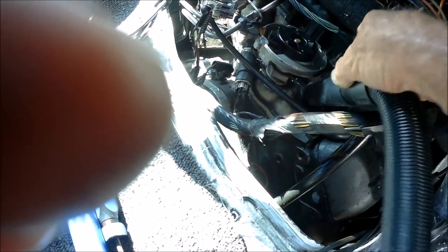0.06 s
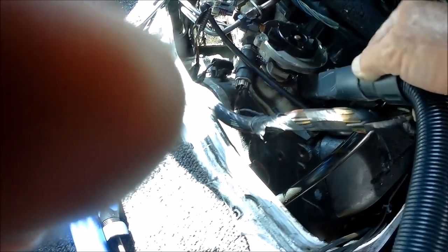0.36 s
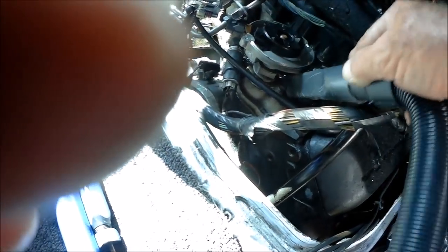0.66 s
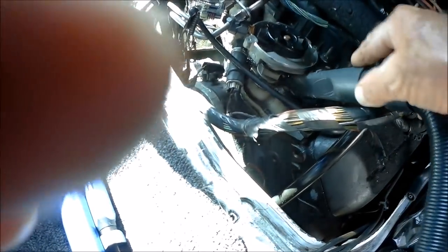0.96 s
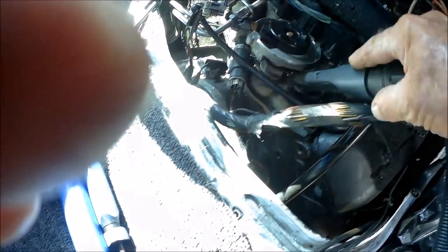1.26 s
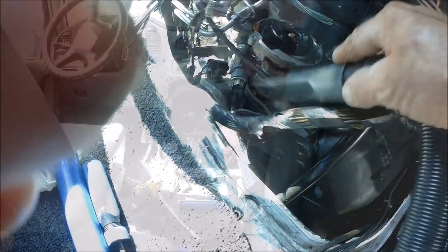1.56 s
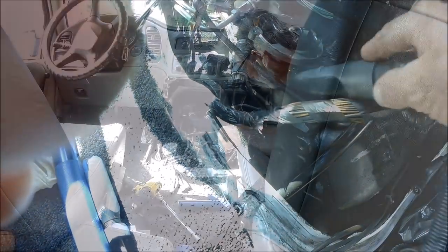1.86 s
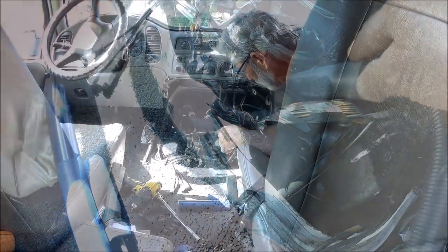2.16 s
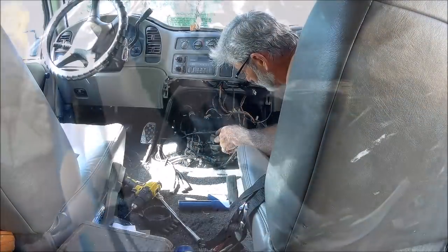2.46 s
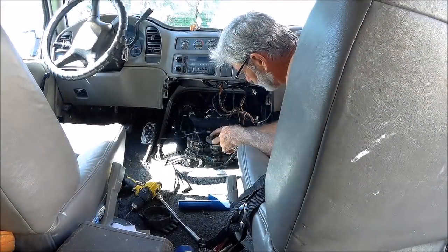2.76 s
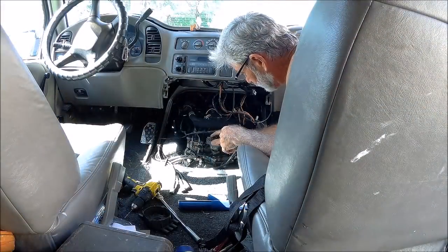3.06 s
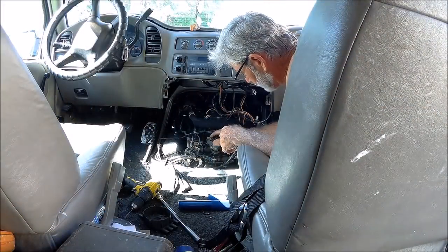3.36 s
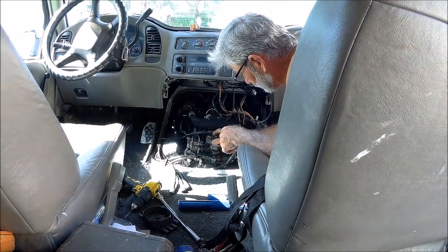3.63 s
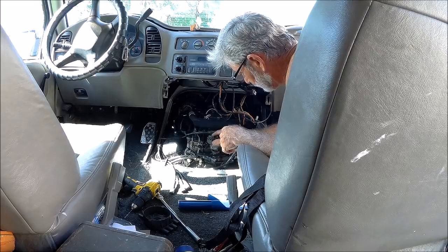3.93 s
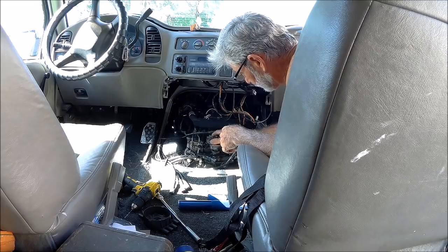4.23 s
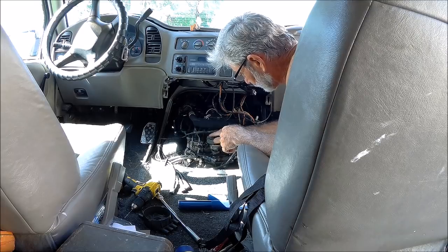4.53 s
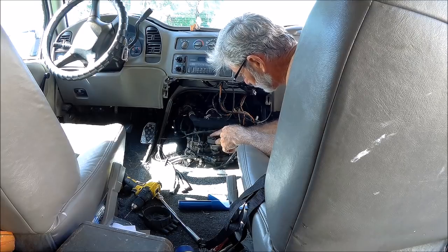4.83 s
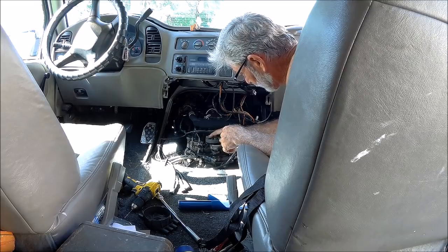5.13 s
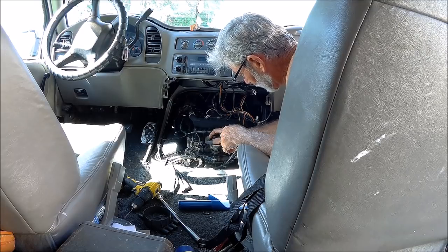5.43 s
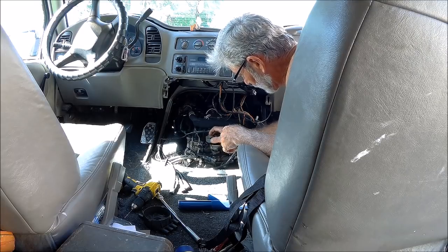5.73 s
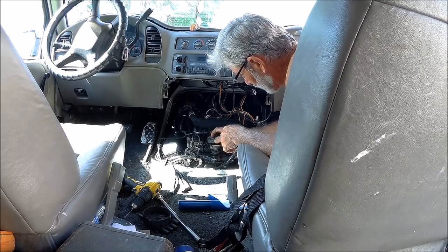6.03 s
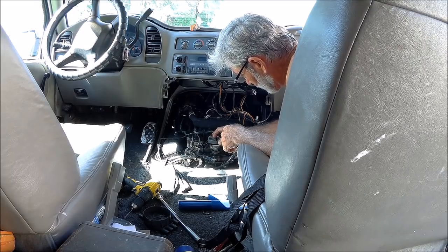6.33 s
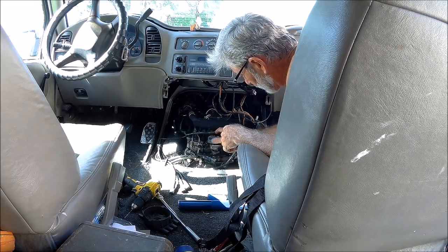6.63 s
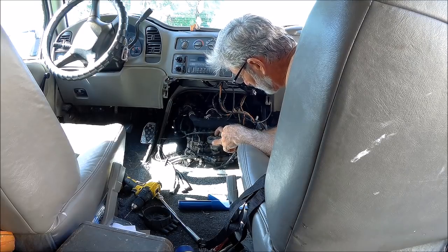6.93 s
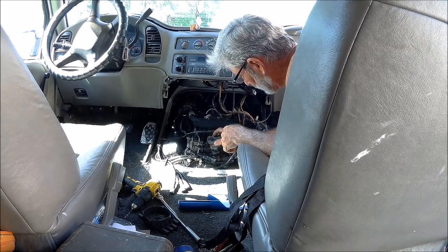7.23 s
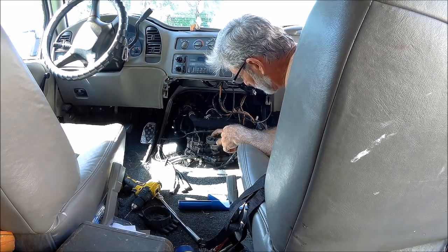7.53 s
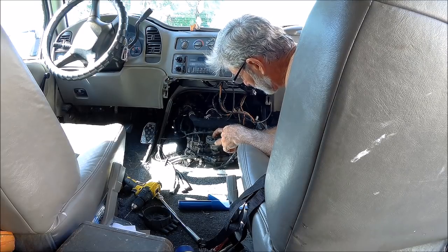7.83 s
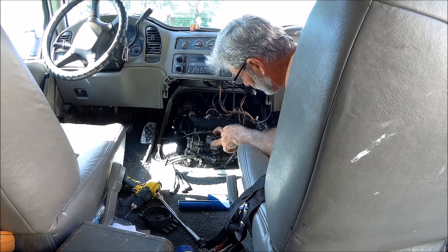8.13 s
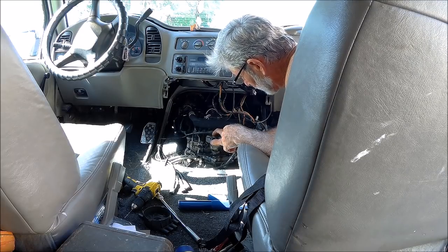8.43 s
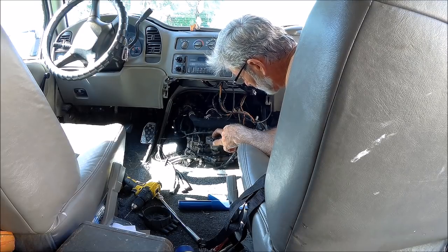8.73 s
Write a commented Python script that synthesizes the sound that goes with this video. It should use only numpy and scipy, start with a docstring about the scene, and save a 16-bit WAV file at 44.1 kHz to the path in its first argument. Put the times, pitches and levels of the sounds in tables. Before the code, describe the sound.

From the start, a small vacuum cleaner runs close by inside a van, the loudest sound: turbulent rushing air and fluttering nozzle hiss, with a steady high whine over a lower motor hum. The hose gives a hollow swell around 1.3 seconds, and a faint deep rumble sets in there, ebbing by 3.5. At 2.8 seconds the vacuum cuts off dead. A sharp clack follows at 2.9, then a brief rub. A hand works at engine fittings, making short, irregular clicks with a slight metallic ring in the cramped cab. A few come between 3.7 and 4 seconds, lighter ones follow, and a quick, louder cluster falls between 5 and 5.4. Softer clicks and small scrapes continue until about 8.6 seconds. Underneath throughout lies a quiet wash of outdoor air, joined after the first second by the low, wavering drone of distant engines.

```python
"""Inside a van, a small vacuum cleaner sucks at the engine bay: turbulent air rushes through nozzle and
hose, exciting their resonances, under the whine of a nine-blade fan. Its sound is cut off dead. Then a
hand rubs and works at the engine's fittings, whose impacts click, clack and ring in the cramped cab.
Distant engines drone over a wash of outdoor air, and a deep rumble sets in and ebbs."""
import sys
import numpy as np
from scipy import signal
from scipy.fft import rfft, irfft, next_fast_len
from scipy.io import wavfile
from scipy.ndimage import uniform_filter1d

SR = 44100
rng = np.random.default_rng(int(sys.argv[2]) if len(sys.argv) > 2 else 0)


def unload_audio(sound):
    """Save the sound as a 16-bit wav file, at the path given as the first command line argument."""
    columns = np.transpose(np.atleast_2d(sound))
    # keep every value between -1 and 1, then stretch to whole-number steps
    steps = np.round(np.clip(columns, -1, 1) * 32767)
    wavfile.write(sys.argv[1], SR, steps.astype(np.int16))


N = 387198
T = np.arange(N) / SR


def undb(db):
    """Decibels to amplitude ratio."""
    return 10 ** (np.asarray(db) / 20)


def unit(x):
    """Normalise to rms 1."""
    return x / np.sqrt(np.mean(x ** 2))


def curves(table):
    """Linear interpolation of (time_s, value, ...) rows: one curve per value column."""
    times, *columns = np.transpose(table)
    return [np.interp(T, times, column) for column in columns]


def swell(centre_s, half_s):
    """Gaussian envelope, down to 1/e at half_s either side of its centre."""
    return np.exp(-((T - centre_s) / half_s) ** 2)


def colour(x, points):
    """Spectral shaping by (frequency_hz, gain_db) points, joined on a log frequency axis."""
    hz, db = np.transpose(points)
    bins_hz = np.maximum(np.fft.rfftfreq(len(x), 1 / SR), 1)
    gain_db = np.interp(np.log(bins_hz), np.log(hz), db)
    return irfft(rfft(x) * undb(gain_db), len(x))


def band(x, lo_hz, hi_hz, order=2):
    """Causal Butterworth band-pass."""
    return signal.sosfilt(signal.butter(order, [lo_hz, hi_hz], "band", fs=SR, output="sos"), x)


def noise(points):
    """Gaussian noise with a given spectral shape, rms 1."""
    return unit(colour(rng.standard_normal(next_fast_len(N)), points)[:N])


def walk(rate_hz):
    """Slow random modulation: values held for 1 / rate_hz and smoothed twice, rms 1."""
    hold = int(SR / rate_hz)
    held = np.repeat(rng.standard_normal(N // 20)[:N // hold + 1], hold)
    return unit(uniform_filter1d(uniform_filter1d(held, hold), hold)[:N])


def tone(hz):
    """A sine of rms 1 whose phase is the integral of a frequency curve."""
    return np.sqrt(2) * np.sin(2 * np.pi * (np.cumsum(hz) / SR + rng.random()))


def resonance(hz, width_hz):
    """A randomly driven resonator gives narrow-band noise about a steady or moving centre; rms 1."""
    if np.ndim(hz) == 0:
        return unit(band(rng.standard_normal(N), hz - width_hz / 2, hz + width_hz / 2))
    lowpass = signal.butter(2, width_hz / 2, fs=SR, output="sos")
    in_phase, quadrature = signal.sosfilt(lowpass, rng.standard_normal((2, N)))
    phase = 2 * np.pi * np.cumsum(hz) / SR
    return unit(in_phase * np.cos(phase) + quadrature * np.sin(phase))


def ring(t, hz, db, t60_s):
    """Free vibration of a damped mode: a sine that falls 60 dB in t60_s."""
    return undb(db - 60 * t / t60_s) * np.sin(2 * np.pi * (hz * t + rng.random()))


def outdoor_air(level_db=-45.5):
    """Ambient noise: a soft broadband wash, strongest at low frequencies."""
    # frequency_hz, relative_density_db
    spectrum = [(20, -8.5), (55, -3.5), (110, -5), (160, -4.5), (250, -11), (400, -13), (750, -12.5),
                (1100, -12), (1450, -16.5), (1750, -16.5), (2400, -21.5), (3500, -28.5), (9000, -32.5),
                (14000, -33.5)]
    return undb(level_db + .3 * walk(12)) * noise(spectrum)


def drone(hz, db):
    """Periodic firing gives a distant engine its note, wavering in level and pitch."""
    return undb(db + 1.8 * walk(9.5)) * tone(hz + 0.8 * walk(14))


def traffic(high_hz=86.2, low_hz=64, eases_s=3.57, enters_s=3.3, pulls_s=7.9, climb_hz_per_s=8):
    """Firing frequency follows engine speed: one engine eases off; another enters, then pulls away."""
    # the first engine: time_s, level_db
    near_level = [(1.2, -80), (1.35, -43.5), (1.8, -58), (2.2, -46), (3.4, -49), (3.6, -49), (3.8, -48),
                  (4.3, -50), (4.5, -52), (4.7, -43), (5.65, -47.5), (6.0, -58.5), (6.4, -49), (6.9, -50),
                  (7.6, -55.5), (8.7, -54)]
    eased = (1 + np.tanh((T - eases_s) / .18)) / 2
    near = drone(high_hz + (low_hz - high_hz) * eased, curves(near_level)[0])
    arrival = np.clip((T - enters_s) / .15, 0, 1)
    far_hz = 103 + climb_hz_per_s * np.maximum(T - pulls_s, 0)
    far_db = -60.5 + (T - enters_s)  # grows 1 dB a second
    return near + arrival * drone(far_hz, far_db)


def rumble():
    """Narrow-band noise low in the bass is heard as a deep rumble; it sets in and ebbs."""
    # time_s, level_db
    level = [(1.22, -74), (1.3, -49), (2.2, -51), (2.9, -55), (3.6, -67)]
    return undb(curves(level)[0]) * resonance(42.7, width_hz=24)


def rubbing():
    """Sliding friction: the hand scrapes along the parts in short strokes of grainy noise."""
    # strokes of the hand: centre_s, half_length_s, level_db
    strokes = [(3.28, 0.019, -49), (6.916, .02, -51), (7.07, .012, -53), (7.197, .02, -51),
               (7.26, .025, -46.5), (7.735, .012, -51), (7.905, .012, -49), (7.96, .01, -50)]
    # friction noise: frequency_hz, relative_density_db
    spectrum = [(400, -25), (800, -4), (1200, -7), (1650, 4), (2100, 1), (2550, -10), (3000, -6),
                (3600, -16), (4500, -28), (9000, -40)]
    envelope = sum(undb(db) * swell(s, half_s) for s, half_s, db in strokes)
    grain_db = 3 * walk(250)
    return envelope * unit(undb(grain_db) * noise(spectrum))


def chatter(t, chatter_s, tail_db=-20, tail_t60_s=.34):
    """Contact noise: a burst of random force with the cab's short reverberant tail; rms 1."""
    # colour of a contact: frequency_hz, gain_db
    spectrum = [(250, 0), (500, -5), (820, 1), (1000, -3), (1180, -4), (1430, 9), (1650, 15), (2000, 13.5),
                (2350, 18.5), (2700, -5.5), (3250, -5), (4200, -15), (7000, -17), (9000, -25)]
    burst = np.exp(-(t / (1.25 * chatter_s)) ** 2.5) * (1 + .6 * np.exp(-t / .002))
    tail = undb(tail_db - 60 * t / tail_t60_s)
    force = rng.standard_normal(len(t)) * (burst + tail)
    return unit(colour(np.pad(force, (0, len(t))), spectrum)[:len(t)])


def fitting_modes(t):
    """Modal superposition: each contact lands elsewhere and so favours other modes; rms 1."""
    # modes of the fittings: pitch_hz, relative_db, t60_s
    modes = [(803, 5.5, 0.077), (1652, 19, 0.1), (1767, 9, 0.086), (1925, 20.5, 0.068), (2170, 10, 0.12),
             (2350, 7, 0.14), (2400, -6, 0.14), (2780, -1, 0.18), (3550, -1, 0.078)]
    favour_db = 3 * rng.standard_normal(len(modes))
    return unit(sum(ring(t, hz, db + extra, t60) for (hz, db, t60), extra in zip(modes, favour_db)))


def metal_rings(t, twang_db, tick_db, ping_gain):
    """Impact excites high modes: a springy twang, thin tings and a ping, each dying away freely."""
    # springy part: pitch_hz, relative_db, t60_s
    twang_modes = [(2960, 3, 0.053), (3300, -4, 0.035), (3374, -1.5, 0.083)]
    # thin metal: pitch_hz, relative_db, t60_s
    ting_modes = [(4660, -5, .045), (5350, -1, .06), (6100, -4, .045), (6750, 1, .055), (7170, -2, .045)]
    detune = 1 + .015 * rng.standard_normal()
    twang = sum(ring(t, hz * detune, db, t60) for hz, db, t60 in twang_modes)
    tings = sum(ring(t, hz * detune, db + 4 * rng.standard_normal(), t60) for hz, db, t60 in ting_modes)
    ping = ping_gain * ring(t, hz=5330, db=12, t60_s=.1)
    return undb(twang_db) * twang + undb(tick_db) * (tings + ping)


def click(strength_db, weight_db, hardness_db, pitch_hz, chatter_s, firm_db=-24, hard_db=-39):
    """One impact: around a pitched clack, weight fills in the low bands and hardness the high ones."""
    # bounds of the thud, knock, rattle, snap and tick bands: edge_hz
    edges = [430, 1000, 1450, 2650, 4100, 8400]
    t = np.arange(SR // 4) / SR
    rise_s = .0004 * undb(.35 * (firm_db - strength_db))  # light touches start more softly
    onset = 1 - np.exp(-t / rise_s)
    contact = onset * (chatter(t, chatter_s) + undb(-5) * fitting_modes(t))
    clack = unit(band(contact, .86 * pitch_hz, 1.14 * pitch_hz, order=3))
    bands = np.array([unit(band(contact, lo, hi, order=5)) for lo, hi in zip(edges, edges[1:])])
    bands[-1] = unit(bands[-1] * (1 + 1.1 * np.exp(-t / .004)))  # the tick bites at first touch
    thud_db, knock_db = weight_db - 15.5, weight_db - 19.5
    rattle_db = (weight_db + hardness_db) / 2 - 10.5
    snap_db, tick_db = hardness_db - 12.5, .99 * hardness_db - 21
    body = clack + undb([thud_db, knock_db, rattle_db, snap_db, tick_db]) @ bands
    body *= np.sqrt(.025 / t[-1])  # gives the clack the energy of 25 ms at rms 1
    twang_db = snap_db + .97 * hardness_db
    ping_gain = min(undb(strength_db + tick_db - hard_db), 1) ** 2  # only a hard blow wakes it fully
    metal = metal_rings(t, twang_db, tick_db, ping_gain)
    return undb(strength_db) * (body + onset * metal)


def fittings():
    """Superposed transients: the fittings click one after another as the hand works at them."""
    # start_s, strength_db, weight_db, hardness_db, pitch_hz, chatter_s
    contacts = [(2.86, -45, -2, -1, 1690, 0.016), (2.9148, -24, 4, 5.5, 1970, 0.018),
                (3.686, -48, 19.5, 12.5, 2140, 0.021), (3.708, -41, 2, 1, 1590, 0.021),
                (3.76, -37, 2, 2.5, 1980, 0.016), (3.9041, -25.5, -13, -11.5, 1770, 0.011),
                (4.0276, -31.5, -11, -9, 1780, 0.0079), (4.4616, -41, 10.5, -4, 1960, 0.0064),
                (4.6822, -44.5, 9.5, -1, 2240, 0.0061), (4.805, -48, -2, 0, 1930, 0.011),
                (4.994, -41.5, -7, -12, 1910, 0.0062), (5.0892, -34.5, 5, 2, 1950, 0.022),
                (5.181, -30, 3, 0.5, 1170, 0.012), (5.211, -42, 7, 3, 1500, .006),
                (5.2345, -24, -12, -6, 1900, 0.012), (5.2405, -27.5, -13, -6, 1880, 0.007),
                (5.27, -43, -4, 6, 1900, 0.023), (5.2928, -23, 1, -3.5, 1900, 0.0058),
                (5.2962, -29.5, 3.5, 1, 2000, 0.017), (5.363, -38, 0, -5, 1840, .013),
                (5.387, -32.5, -3, -0.5, 1925, 0.012), (5.766, -38, 3, -1.5, 1750, 0.026),
                (5.892, -37.5, 8, 1, 1870, 0.026), (5.962, -50.5, 20.5, 2, 2070, 0.018),
                (6.037, -36, -1, -2.5, 1850, 0.03), (6.1237, -39, 10.5, 3, 1690, 0.027),
                (6.415, -35.5, -15, -3, 1630, 0.011), (6.424, -41.5, 6, 11, 2010, 0.026),
                (6.882, -40, 3, -2.5, 1720, 0.029), (6.973, -40, 6, -26, 1510, 0.0086),
                (6.9959, -40, 5, 1.5, 1700, 0.024), (7.221, -50, 1, 7.5, 1820, 0.03),
                (7.356, -43.5, 10, 4.5, 2200, 0.019), (7.393, -45.5, 14, 7, 2220, 0.014),
                (7.423, -39, 13, 6, 1810, 0.025), (7.487, -41, 8.5, 1.5, 1820, 0.022),
                (7.596, -38, 6.5, 7.5, 2020, 0.018), (7.634, -50.5, 15, 7, 1800, 0.012),
                (7.855, -40, -2, -14, 1720, 0.014), (8.09, -46, -9, -6, 1760, 0.0054),
                (8.3873, -38.5, -6, -8, 1910, 0.017), (8.559, -37, -3, -6, 1770, 0.025),
                (8.592, -36.5, -5, -6, 1915, 0.011)]
    out = np.zeros(N + SR)
    for start_s, *contact in contacts:
        sound = click(*contact)
        start = int(start_s * SR)
        out[start:start + len(sound)] += sound
    return out[:N]


def hose_boom(rest_db=-53):
    """Low resonances of the hose, driven by the flow, swell at times above a steady level."""
    # centre_s, half_length_s, level_db
    booms = [(0.58, 0.14, -40.5), (1.333, 0.27, -33.5), (2.598, 0.12, -46)]
    # centre_hz, width_hz, relative_db
    modes = [(353, 31, -2.5), (654, 240, -1.5)]
    envelope = undb(rest_db) + sum(undb(db) * swell(s, half_s) for s, half_s, db in booms)
    return envelope * sum(undb(db) * resonance(hz, width) for hz, width, db in modes)


def turbulence(depth_db=1.3):
    """Broadband flow noise, whose bands the eddies modulate independently; rms 1."""
    # rushing air: frequency_hz, relative_density_db
    shape = [(30, -33), (150, -14.5), (280, -11), (420, -6), (670, -9.5), (860, -4), (980, 3), (1350, 0),
             (1490, -1.5), (2030, -2), (2250, 2.5), (3150, -3.5), (3750, -12.5), (5000, -47)]
    # bounds of the flickering bands: edge_hz
    edges = [0, 900, 1030, 1170, 1350, 1600, 1850, 2080, 2280, 2500, 2800, 3100, 22050]
    size = next_fast_len(N)
    spectrum = rfft(noise(shape), size)
    hz = np.fft.rfftfreq(size, 1 / SR)
    bands = (irfft(spectrum * ((hz >= lo) & (hz < hi)), size)[:N] for lo, hi in zip(edges, edges[1:]))
    return unit(sum(part * undb(depth_db * walk(40.07)) for part in bands))


def suction(rough_from_s=1.8):
    """Turbulence drives the cavity resonances of hose, canister and moving nozzle."""
    # hollows of hose and canister: centre_hz, width_hz, relative_db
    cavities = [(471, 33, -28), (782, 61, -21), (1055, 180, -19), (1224, 66, -17), (1843, 53, -17.5),
                (1945, 36, -16.5), (2553, 38, -15), (2690, 140, -17.5), (3020, 45, -24), (4010, 91, -26.5)]
    # upper resonance of the moving nozzle: time_s, centre_hz, relative_db
    upper = [(0, 2780, -1), (.12, 2800, -9), (.2, 3120, -10.5), (.36, 3120, -11.5), (.8, 3094, -17),
             (1.05, 2830, -14), (1.35, 2850, -26), (1.55, 2920, -17), (1.75, 3120, -13), (2.0, 3120, -14),
             (2.8, 3070, -33)]
    # its lower resonance: time_s, centre_hz, relative_db
    lower = [(0, 2170, -13), (.7, 2182, -13), (1.25, 2220, -8.5), (1.6, 2260, -11), (1.85, 2300, -6),
             (2.3, 2204, -13), (2.5, 2266, -22), (2.75, 2170, -13)]
    # resonances the stream catches for a moment: centre_s, centre_hz, relative_db
    catches = [(.31, 1110, -7), (.37, 2040, -14), (.67, 2210, -4), (.82, 945, -4.5), (.89, 1160, -6.5),
               (1.02, 2260, -10), (1.18, 1080, -3), (1.2, 2240, -3), (1.3, 2200, -3), (1.48, 1270, -3),
               (1.76, 2230, -16), (1.87, 2230, 1), (1.99, 1610, -5.5), (2.05, 1090, -2), (2.1, 1130, -4),
               (2.19, 2170, 0), (2.265, 1960, 1), (2.33, 1270, -6), (2.695, 2130, -1.5),
               (2.745, 1110, -4.5)]
    # the whole rush as the nozzle moves about: time_s, gain_db
    gain = [(0, -20.5), (.36, -19.5), (.56, -20.5), (.75, -20), (1.65, -20), (1.88, -20.5), (1.97, -21),
            (2.1, -20.5), (2.27, -21.5), (2.4, -21), (2.55, -21), (2.75, -20)]
    hollows = sum(undb(db + 2.1 * walk(21.8)) * resonance(hz, width) for hz, width, db in cavities)
    nozzle = sum(undb(db) * resonance(hz, width_hz=130) for hz, db in (curves(upper), curves(lower)))
    surges = sum(undb(db) * swell(s, half_s=.027) * resonance(hz, width_hz=155) for s, hz, db in catches)
    depth_db = np.where(T < rough_from_s, .45, 1.0)  # more flutter once the nozzle is close to the parts
    rasp_db = .5 * walk(160) + depth_db * walk(60)
    return undb(curves(gain)[0] + rasp_db) * (turbulence() + hollows + nozzle + surges)


def nozzle_hiss():
    """High-frequency flow noise at the nozzle flutters, with a thin whistle that is strongest early on."""
    # hiss: frequency_hz, relative_density_db
    spectrum = [(3400, -68), (3900, -1), (4300, 5), (4800, 0), (5200, -11.5), (5500, -3), (5850, -9.5),
                (6400, -1.5), (7800, -8.5), (9300, -11), (9950, -19.5), (11000, -11.5), (14200, -17),
                (15800, -30)]
    # time_s, level_db
    hiss_level = [(0, -33.5), (0.45, -33), (0.88, -31.5), (1.02, -34.5), (1.4, -31.5), (1.8, -34.5),
                  (2.2, -32.5), (2.8, -32)]
    # time_s, level_db
    whistle_level = [(0, -39.5), (0.25, -39), (0.4, -44), (0.8, -37), (1.0, -49)]
    flutter_db = 1.1 * walk(28) + .9 * walk(110)
    hiss = undb(curves(hiss_level)[0]) * noise(spectrum)
    whistle = undb(curves(whistle_level)[0]) * resonance(6500, width_hz=2000)
    return undb(flutter_db) * (hiss + whistle)


def airflow(delay_s=.029, reflection=.16):
    """Reflection at the hose end adds a weak echo to rush and hiss, while the hose booms beneath."""
    air = suction() + nozzle_hiss()
    echo = np.interp(T - delay_s, T, air, left=0)
    return air + reflection * echo + hose_boom()


def motor(shaft_hz=464.1, blades=9, lag_hz=1.1, settled_s=1.1):
    """Rotation gives shaft harmonics and a whine at the blade-passing frequency; the housing sings along."""
    # shaft harmonics: order, level_db
    harmonics = [(1, -33), (12, -54), (15, -72)]
    # second harmonic: time_s, level_db
    octave_level = [(0.1, -36), (0.55, -57), (0.7, -33.5), (1.3, -33.5), (2.1, -33.5), (2.3, -36.5),
                    (2.8, -38)]
    # blade-passing tone: time_s, level_db
    whine_level = [(0.11, -53), (0.17, -32), (.38, -32), (0.45, -28), (0.76, -29.5), (1.08, -27),
                   (1.45, -28), (1.7, -26), (2.08, -25), (2.2, -28), (2.5, -28.5), (2.6, -23),
                   (2.68, -28.5), (2.8, -25.5)]
    # steady tones of housing and hose: pitch_hz, level_db
    housing_tones = [(204, -53.5), (1206.6, -34.5)]
    settling = np.clip(1 - (T / settled_s) ** 4, 0, 1)  # the motor gains a little speed at first
    hz = shaft_hz - lag_hz * settling + .238 * walk(8.12)
    throb_db = .8 * walk(30)
    shaft = undb(throb_db) * sum(undb(db) * tone(order * hz) for order, db in harmonics)
    octave_db = curves(octave_level)[0] + 1.5 * walk(25)
    octave = undb(octave_db) * tone(2 * hz + 7.5 * walk(40))
    whine_db = curves(whine_level)[0] + walk(70) + .64 * walk(18)  # flutters in the turbulent air
    whine = undb(whine_db) * tone(blades * hz + 1.6 * walk(90))
    housing = sum(undb(db + 1.8 * walk(9.1)) * tone(f + 1.65 * walk(15.83)) for f, db in housing_tones)
    return shaft + octave + whine + housing


def scene(cut_s=2.826):
    """Superposition of all sources in one channel; the cleaner is cut off within a millisecond."""
    running = np.clip((cut_s - T) * 1000, 0, 1)
    cleaner = running * (motor() + airflow())
    hand = fittings() + rubbing()
    background = outdoor_air() + traffic() + rumble()
    return (cleaner + hand + background)[None]


def record(dry, top_hz=15550):
    """Band limiting: a steep elliptic low-pass removes the highest treble."""
    return signal.sosfilt(signal.ellip(10, .2, 80, top_hz, fs=SR, output="sos"), dry)


dry = scene()
out = record(dry)
unload_audio(out)
```